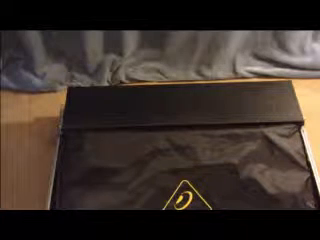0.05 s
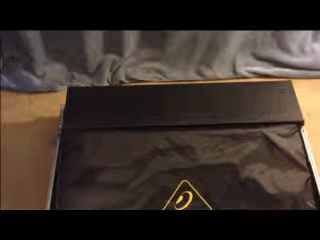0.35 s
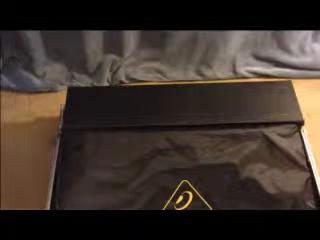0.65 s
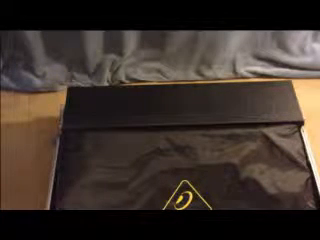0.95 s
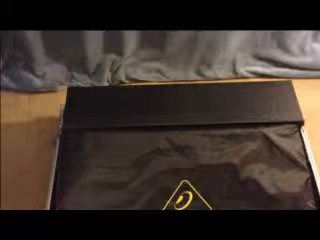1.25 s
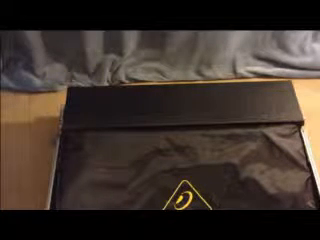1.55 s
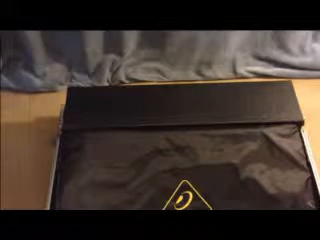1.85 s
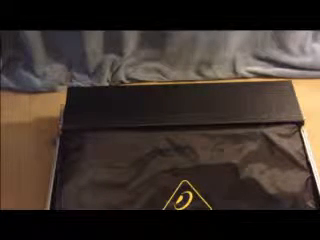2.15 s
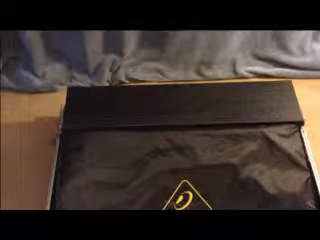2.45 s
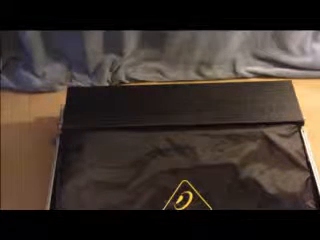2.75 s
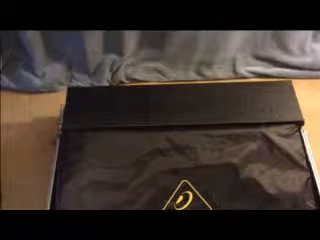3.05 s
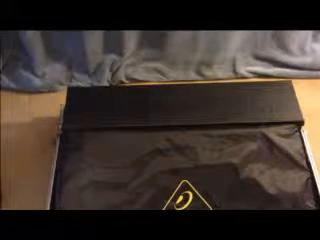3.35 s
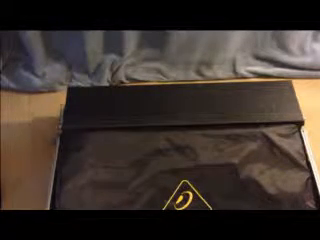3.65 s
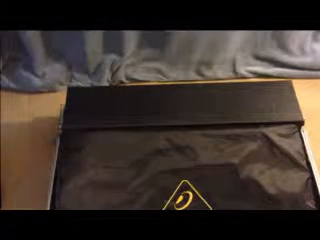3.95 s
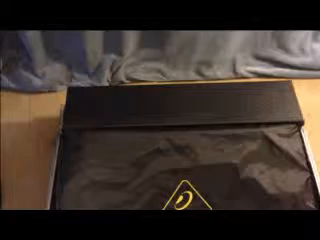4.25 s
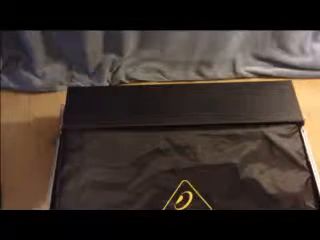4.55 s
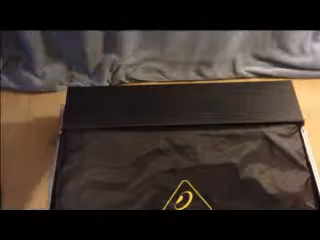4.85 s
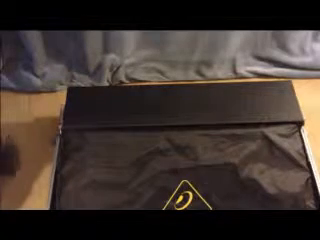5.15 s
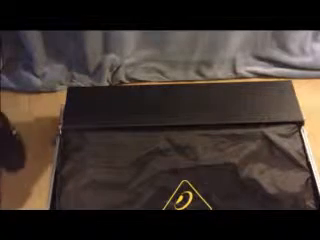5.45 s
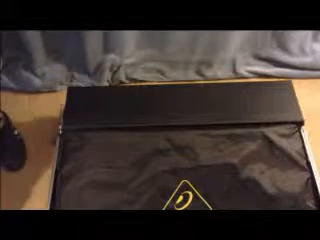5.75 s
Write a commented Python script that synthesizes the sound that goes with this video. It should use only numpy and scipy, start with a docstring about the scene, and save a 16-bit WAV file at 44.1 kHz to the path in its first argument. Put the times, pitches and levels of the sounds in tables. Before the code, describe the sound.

In a small room, sleeves rub while hands knock on a hollow equipment case and its metal fittings tick. Two spring latches snap open loudly, one after the other, the first making the panels boom. Then hard shoes take a couple of slow steps on a wooden floor, among light shuffles, bumps and small metallic pings. A small fan whines faintly throughout, and the microphone seems close to the case.

```python
"""A small fan whines faintly in a small room, from start to end.
Sleeves rub, metal fittings ping and tick, and hands knock on the hollow shell of an equipment case.
A thumb pries at two spring latches; they snap open one after the other and the panels boom.
Then hard shoes step round the case on a wooden floor, among more light bumps and ticks."""
import sys
import numpy as np
from scipy import signal
from scipy.fft import rfft, irfft
from scipy.io import wavfile
from scipy.ndimage import uniform_filter1d

SR = 44100
rng = np.random.default_rng(int(sys.argv[2]) if len(sys.argv) > 2 else 0)


def dump(signal):
    """Clip the signal to [-1, 1] and save it as 16-bit WAV at the path in sys.argv[1]."""
    limited = np.clip(np.atleast_2d(signal).T, -1, 1)
    pcm = np.round(limited * 32767).astype(np.int16)
    wavfile.write(sys.argv[1], SR, pcm)


N = 259426
SIZE = 2 ** 15  # samples in one blow or ring
T, HZ = np.arange(SIZE) / SR, np.fft.rfftfreq(SIZE, 1 / SR)  # its times and frequencies


def amp(db):
    """Turns decibels (dB) into a number to multiply by."""
    return 10 ** (np.asarray(db) / 20)


def unit(x):
    """Scales a sound to an energy of one."""
    return x / np.sqrt(np.sum(x ** 2) + 1e-20)


def curve_at(points, hz):
    """Joins (frequency, value) points with lines on a pitch scale and reads them at hz."""
    point_hz, value = np.transpose(points)
    return np.interp(np.log(hz + 1), np.log(point_hz), value)


def add(mix, s, sound):
    """Mixes a sound in, starting at s seconds."""
    part = mix[round(s * SR):][:len(sound)]
    part += sound[:len(part)]


def causal(gain):
    """Makes a filter from a gain curve so that nothing rings before the blow (minimum phase)."""
    cepstrum = irfft(np.log(gain + 1e-7))
    cepstrum[1:SIZE // 2] *= 2
    cepstrum[SIZE // 2 + 1:] = 0
    return np.exp(rfft(cepstrum))


def noise(colour):
    """Noise with an average power of one; its colour says how strong each frequency is."""
    gain = amp(curve_at(colour, np.fft.rfftfreq(N, 1 / SR)))
    return unit(irfft(rfft(rng.standard_normal(N)) * gain, N)) * np.sqrt(N)


def drift(rate_hz):
    """A smooth random wander, about one in size."""
    knots = rng.standard_normal(2048)
    return np.interp(np.arange(N) / SR * rate_hz, np.arange(len(knots)), knots)


def room_echoes(count=12):
    """Echoes for different spots in the room; the low notes last longest."""
    # Each row: frequency in Hz, seconds to fade by 60 dB (called t60).
    fade_times = [(100, 0.39), (220, 0.33), (500, 0.24), (1200, 0.2), (3000, 0.18), (8000, .19)]
    hz, t60 = np.transpose(fade_times)
    bands = np.array([np.interp(np.log(HZ + 1), np.log(hz), row) for row in np.eye(len(hz))])
    fade = np.exp(-np.log(1000) * T / t60[:, None])
    return [unit((irfft(bands * rfft(rng.standard_normal(SIZE))) * fade).sum(0)) for _ in range(count)]


def blows(hits, colour, modes, crack_db, room_db, build_s, softness, patchy_db):
    """Each blow is a crack, a short grind and an echo, all ringing the object's own notes (modes)."""
    resonance = 1 + sum(amp(db) / (1 + 2j * (HZ - hz) / width) for hz, width, db in modes)
    bass = 1 / (1 + (HZ / 250) ** 4)
    treble = HZ ** 2 / (HZ ** 2 + 2000 ** 2)
    colour_db, echoes, out = curve_at(colour, HZ), room_echoes(), np.zeros(N)
    patch_hz = np.geomspace(400, 10000, 30)
    for k, (s, db, bass_db, bright_db, contact_s) in enumerate(hits):
        contact = np.exp(-T / contact_s)
        press = 1 - contact ** (1 / softness)  # a long contact takes longer to press in
        grind = unit(rng.standard_normal(SIZE) * contact * press)
        grind[0] += amp(crack_db)
        echo = unit(echoes[k % len(echoes)] * (1 - contact) * (1 - np.exp(-T / build_s)))
        strike = rfft(grind + amp(room_db) * echo)
        # Even out the strike, so the object and the spot that is struck set the colour.
        strike_level = np.sqrt(uniform_filter1d(abs(strike) ** 2, size=120))
        spot_db = patchy_db * np.interp(HZ, patch_hz, rng.uniform(-1, 1, len(patch_hz)))
        tone = causal(amp(colour_db + spot_db + bass_db * bass + bright_db * treble) / strike_level)
        sound = irfft(strike * tone * resonance) * (1 - (T / T[-1]) ** 2)
        add(out, s, amp(db) * np.sqrt(SR / 100) * unit(sound))
    return out


def ring(hz, db, t60, wander, swell_cycles=.8):
    """A note swells and dies away; more pitch wander turns a clean tone into a rough knock."""
    turns = hz * np.cumsum(1 + wander * drift(hz / 3)[:SIZE]) / SR
    swell = (1 - np.exp(-T * hz / swell_cycles)) ** 2
    return amp(db) * swell * np.exp(-np.log(1000) * T / t60) * np.sin(2 * np.pi * turns)


def touch(s, db, hard_db, contact_s, bass_db=0):
    """One hit for blows(): a soft touch is heavy and dull, a hard one light and bright."""
    return s, db, bass_db - 0.34 * hard_db, hard_db, contact_s


def fan(level_db=-60, waver=.005, flutter_db=2.8):
    """Moving air hisses while the fan's blades make a faint, wavering whine."""
    # Each row: frequency in Hz, relative level of the hiss in dB.
    air_colour = [(18, -60.5), (30, -38.5), (127, -11.5), (174, 0), (251, -4), (329, -0.5), (452, -1.5),
                  (591, -4.5), (1060, -5), (1140, -7), (1460, -6), (2260, -5.5), (3690, -14), (7870, -19.5),
                  (10300, -37), (13400, -64.5), (22000, -120)]
    # Each row: pitch of a blade tone in Hz, level in dB compared with the hiss.
    blade_tones = [(1131, -11.5), (2265, -12.5), (3397, -16), (4527, -22.5)]
    time = np.cumsum(1 + waver * drift(30)) / SR
    whine = sum(amp(db + flutter_db * drift(18)) * np.sqrt(2) * np.sin(2 * np.pi * hz * time)
                for hz, db in blade_tones)
    return amp(level_db) * (noise(air_colour) + whine)


def rubbing(fade_s=0.098, lumpy_db=7):
    """Sleeves and soles rub: a dull, uneven noise that fades in and out with each movement."""
    # Each row: frequency in Hz, relative level in dB.
    colour = [(40, -30), (100, -7.5), (170, 12), (420, 15.5), (700, -0.5), (1500, -1), (4000, -16),
              (9000, -58)]
    # Each row: start in seconds, length in seconds, level in dB.
    rubs = [(0.198, .4, -51), (2.28, .36, -63.5), (3.377, 1.57, -65.5), (4.933, 0.57, -69.5)]
    t = np.arange(N) / SR
    level = sum(amp(db) * np.clip(np.minimum(t - s, s + length - t) / fade_s, 0, 1)
                for s, length, db in rubs)
    return noise(colour) * level * amp(lumpy_db * drift(45))


def fittings():
    """Catches tick and creak, and small metal parts ping."""
    # Each row: frequency in Hz, relative level in dB.
    colour = [(100, -28.5), (600, -1), (1100, 0), (1800, 3), (3600, 2.5), (5200, -5), (8000, -12.5),
              (9800, -33)]
    # Each row: ringing pitch in Hz, width in Hz, dB above the colour.
    modes = [(2610, 60, -2.5), (7000, 39, 5.5), (3330, 27, -16), (4820, 94, -2.5)]
    # Each row: start in seconds, strength in dB, brightness in dB, contact time in seconds.
    ticks = [(.254, -48.5, -9, 0.011), (.5265, -34.5, -5.5, 0.0033), (1.034, -37, -10, 0.0067),
             (1.052, -32, 12, 0.0048), (1.061, -38, 1.5, .0024), (1.196, -48, -19, 0.0067),
             (1.2045, -28, -3.5, 0.0026), (2.304, -42.5, 4, 0.0084), (3.566, -48, -8, 0.0088),
             (3.589, -49.5, -15, 0.0049), (3.622, -44.5, -21, 0.0056), (3.867, -54, 41, 0.007)]
    # Each row: start in seconds, pitch in Hz, level in dB.
    pings = [(0.232, 7200, -47.5), (.481, 1120, -37.5), (3.671, 2490, -43.5), (3.864, 7870, -54)]
    hits = [(s, db, 0, bright_db, contact_s) for s, db, bright_db, contact_s in ticks]
    out = blows(hits, colour, modes, crack_db=-19.5, room_db=-4.5,
                build_s=0.0052, softness=0.58, patchy_db=3.5)
    for s, hz, db in pings:
        add(out, s, ring(hz, db, t60=0.16, wander=0.089, swell_cycles=1.7))
    return out


def shell():
    """Hands knock on the hollow shell, and the lid thumps as it shifts on its seal."""
    # Each row: frequency in Hz, relative level in dB.
    colour = [(40, -49), (100, -32.5), (185, 2), (250, -10.5), (430, -2), (620, -5.5), (1300, -8.5),
              (2200, -15.5), (5000, -34), (9000, -59.5)]
    # Each row: ringing pitch in Hz, width in Hz, dB above the colour.
    modes = [(412.5, 30, 20), (476, 20, -10), (682, 18, 10), (1210, 130, -3)]
    # Each row: start in seconds, strength in dB, hardness in dB, contact time in seconds.
    bumps = [(.234, -39, -2, 0.0018), (.252, -30, -21.5, 0.0055), (.298, -34, -23, 0.0045),
             (0.367, -45, -16, 0.013), (0.395, -35, -14, .011), (.4805, -31.5, 6, 0.0042),
             (.494, -29, 0, 0.0061), (0.674, -37.5, 24, 0.0078), (1.058, -35, 10, 0.0069),
             (1.075, -34.5, 2, 0.015), (2.442, -47, 27, 0.014), (3.604, -40, -19, 0.0068),
             (3.670, -39.5, 9, .0015), (3.787, -48, -20, 0.0032), (3.918, -45, -32, 0.0042),
             (4.112, -41.5, -2, 0.0054), (4.185, -42.5, -17, 0.0044), (4.484, -47, -21, 0.0039),
             (4.740, -42, -12, 0.0077), (5.014, -40.5, -3, .015), (5.354, -48, -10, 0.0046)]
    # Each row: start in seconds, level in dB.
    lid_thumps = [(.672, -31), (1.065, -46.5), (1.262, -38)]
    out = blows([touch(*row) for row in bumps], colour, modes, crack_db=-16, room_db=-8,
                build_s=.003, softness=0.35, patchy_db=6)
    for s, db in lid_thumps:
        add(out, s, ring(hz=102.2, db=db, t60=0.17, wander=.012))
    return out


def snap(s, slide_s, chatter_s, db, bright_db):
    """The hits of one snap: the catch slips twice, then the lever bounces ever faster on its stop."""
    slip_bright_db, slip_contact_s = 9, .01
    average_gap_s, bounce_contact_s = .0055, .005
    hits = [(s + part * slide_s, db - 13.5 + 3.5 * part, 0, slip_bright_db, slip_contact_s)
            for part in (0, .5)]
    for progress in np.linspace(0, 1, round(chatter_s / average_gap_s) + 1) ** .75:
        at = s + slide_s + progress * chatter_s
        arch = np.sin(np.pi * progress)  # hardest and brightest midway
        bass_db = -2.5 + 10.5 * progress
        hits.append((at, db + arch, bass_db, bright_db - 1.5 + 10 * arch, bounce_contact_s))
    return hits


def latches():
    """Stiff latches are pried and snap open; midway through the chatter, lever and panels ring."""
    # Each row: frequency in Hz, relative level in dB.
    colour = [(40, -32.5), (110, -28.5), (190, -8.5), (250, -13.5), (430, 5.5), (800, 2.5), (1050, -2),
              (1600, -3), (2300, -8.5), (5000, -8.5), (6500, -11), (8200, -11.5), (9400, -21.5),
              (10300, -53)]
    # Each row: ringing pitch in Hz, width in Hz, dB above the colour.
    modes = [(285, 9.9, 2.5), (418, 25, 0), (484, 18, -2), (522, 18, 2), (723, 16, -2), (737, 90, -6),
             (879, 13, 0.5), (1160, 31, 1.5), (1487, 15, -1), (2560, 36, -2), (2480, 14, -4.5),
             (2830, 96, 0), (3220, 19, 6), (4150, 20, -9), (4560, 20, -9.5), (4830, 22, 3),
             (5160, 26, -16.5), (5840, 26, -10.5), (6160, 120, 2)]
    # Each row: start in seconds, strength in dB, hardness in dB, contact time in seconds.
    thumb_pries = [(.669, -38.5, -5, .008), (.679, -28, -10.5, .001), (.712, -41, -9.5, 0.022),
                   (.736, -37.5, -3.5, 0.0074)]
    # Each row: start, slide time and chatter time in seconds; strength, brightness and
    # panel boom in dB; pitch of the lever's clack in Hz.
    snaps = [(0.7488, .0105, .034, -12, -1.5, -5.5, 788), (1.228, 0.013, .0145, -13.5, -2, -21, 910)]
    # Each row: pitch in Hz, dB added to the boom, fade time in seconds, wander as a share of pitch.
    panel_modes = [(169.6, -22.5, 0.45, .005), (430, -5, .1, 0.11), (534, -11, 0.235, 0.0092),
                   (754, -11.5, .26, .006)]
    hits, out = [touch(*row) for row in thumb_pries], np.zeros(N)
    for s, slide_s, chatter_s, db, bright_db, boom_db, lever_hz in snaps:
        hits += snap(s, slide_s, chatter_s, db, bright_db)
        midway = s + slide_s + chatter_s / 2
        add(out, midway, ring(lever_hz, db + 2, t60=0.032, wander=.22))
        for hz, mode_db, t60, wander in panel_modes:
            add(out, midway, ring(hz, boom_db + mode_db, t60, wander))
    return out + blows(hits, colour, modes, crack_db=-9, room_db=-6,
                       build_s=0.0021, softness=0.098, patchy_db=5.5)


def feet(step_bass_db=0.5, sole_dulling_db=6.5):
    """Each step lands heel then sole, ringing the floorboard and the shoe; light shuffles follow."""
    # Each row: frequency in Hz, relative level in dB.
    colour = [(40, -50.5), (75, -27.5), (120, -8.5), (185, -0.5), (300, -1), (600, -9), (1000, -12),
              (1700, -15.5), (2700, -27), (5000, -36), (8000, -39), (10000, -59)]
    # Each row: ringing pitch in Hz, width in Hz, dB above the colour.
    modes = [(181, 20, -24), (318, 8.4, -1), (490, 12, -10), (1500, 41, -31)]
    # Each row: start in seconds, heel strength in dB, seconds until the sole lands, sole strength in dB,
    # contact time in seconds, heel brightness in dB, floorboard pitch in Hz, shoe pitch in Hz.
    steps = [(2.184, -26, .025, -25.5, 0.0057, 9, 220, 963), (4.566, -26, .064, -35, 0.016, 8, 170.6, 1656)]
    # Each row: start in seconds, strength in dB, hardness in dB.
    shuffles = [(2.273, -40.5, 15.5), (2.511, -48.5, 12.5), (2.554, -46.5, 4), (2.732, -45, -3),
                (2.93, -54.5, -28), (3.293, -47.5, -6), (3.632, -40, 9.5), (4.142, -41, -5),
                (4.773, -42, -8), (4.797, -53, -13), (5.066, -40, -10), (5.087, -46.5, -16)]
    hits = [touch(*row, contact_s=0.0044, bass_db=-3.5) for row in shuffles]
    out = np.zeros(N)
    for s, heel_db, roll_s, sole_db, contact_s, heel_bright_db, board_hz, clack_hz in steps:
        heel = (s, heel_db, heel_bright_db)
        sole = (s + roll_s, sole_db, heel_bright_db - sole_dulling_db)
        for at, db, bright_db in heel, sole:
            hits.append((at, db, step_bass_db, bright_db, contact_s))
            add(out, at, ring(board_hz, db + 3.5, t60=0.11, wander=0.033))
            clack_db = db - 8 + 0.9 * bright_db  # a brighter landing clacks louder
            add(out, at, ring(clack_hz, clack_db, t60=0.11, wander=0.131, swell_cycles=6))
    return out + blows(hits, colour, modes, crack_db=-15, room_db=3,
                       build_s=0.0054, softness=0.22, patchy_db=7.5)


def gain_control(x, threshold_db=-26.5, cut_share=0.27, attack_s=0.0047, recovery_db_per_s=3.5):
    """Loud sounds quickly turn the volume down; then it creeps back up."""
    keep = np.exp(-1 / (attack_s * SR))
    power = signal.lfilter([1 - keep], [1, -keep], (x ** 2).mean(0))
    cut_db = cut_share * np.maximum(10 * np.log10(power + 1e-12) - threshold_db, 0)
    recovered_db = recovery_db_per_s * np.arange(N) / SR
    return x * amp(recovered_db - np.maximum.accumulate(cut_db + recovered_db))


def scene():
    """Adds all the sounds together in one channel."""
    return (fan() + rubbing() + fittings() + shell() + feet() + latches())[None]


def record(dry, low_cut_hz=46, high_cut_hz=10550):
    """A small microphone loses deep bass; loud moments are turned down and the top treble is cut."""
    low_cut = signal.butter(2, low_cut_hz, "high", fs=SR, output="sos")
    high_cut = signal.firwin(511, high_cut_hz, window=("kaiser", 9), fs=SR)
    heard = gain_control(signal.sosfilt(low_cut, dry))
    return signal.oaconvolve(heard, high_cut[None], "same")


dry = scene()
out = record(dry)
dump(out)
```